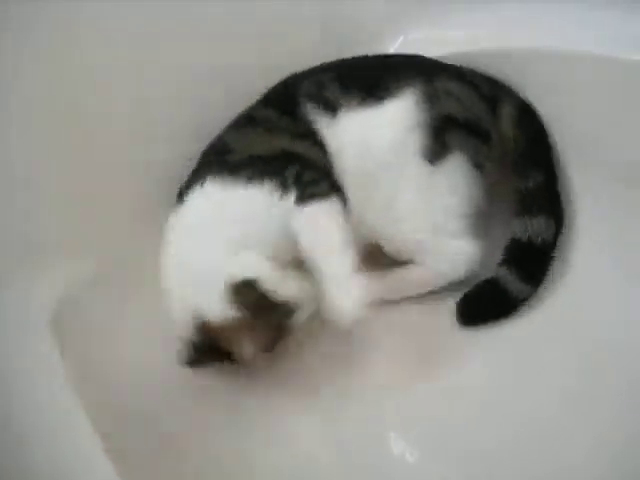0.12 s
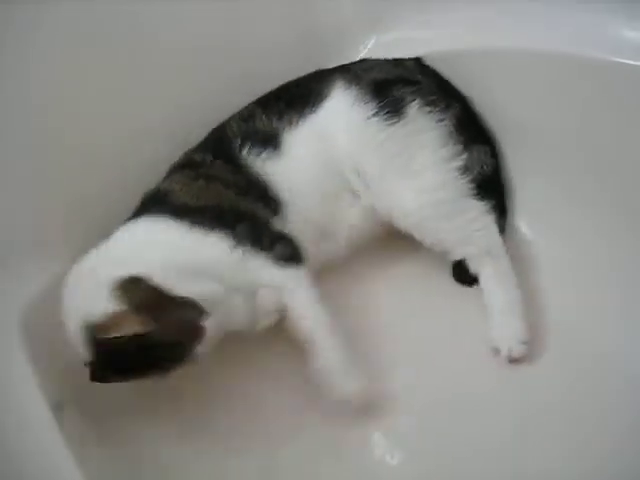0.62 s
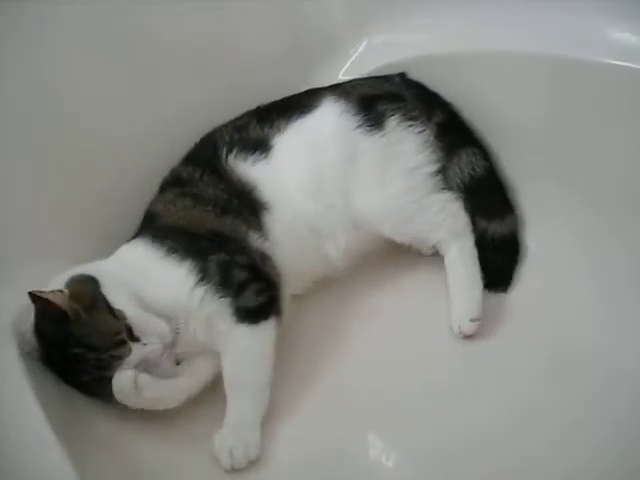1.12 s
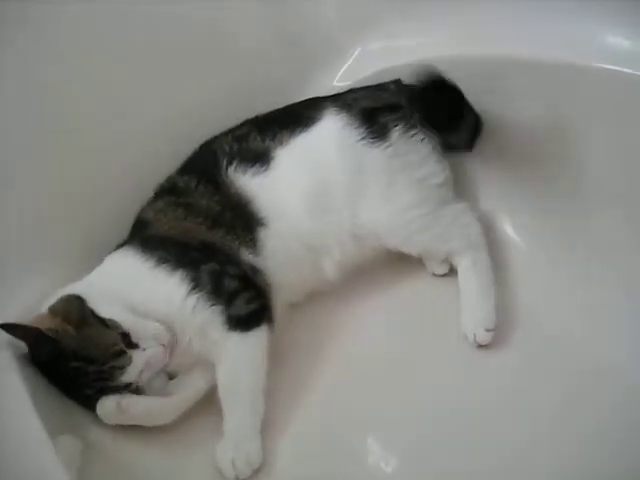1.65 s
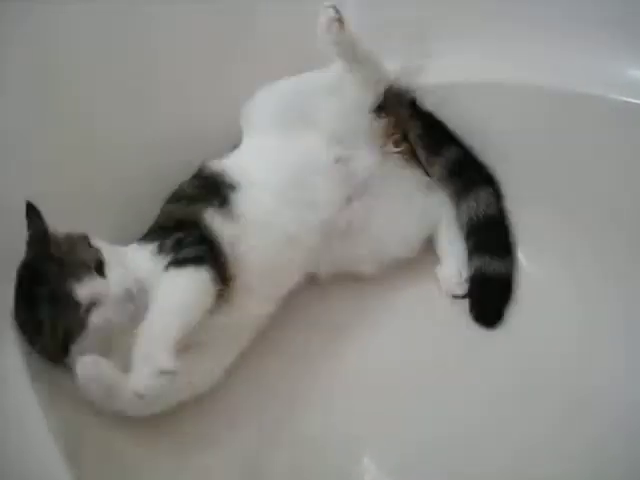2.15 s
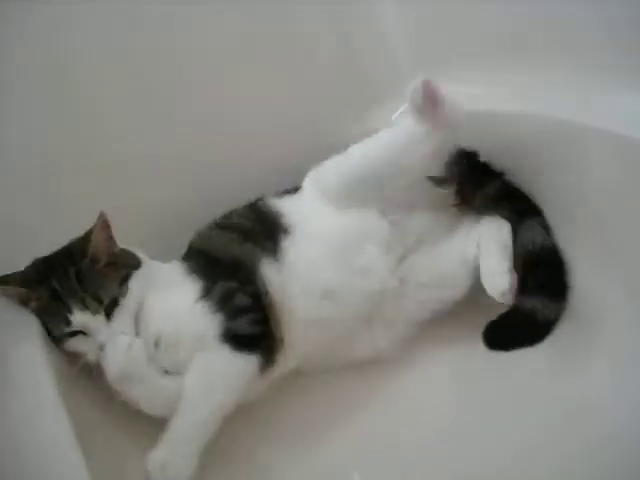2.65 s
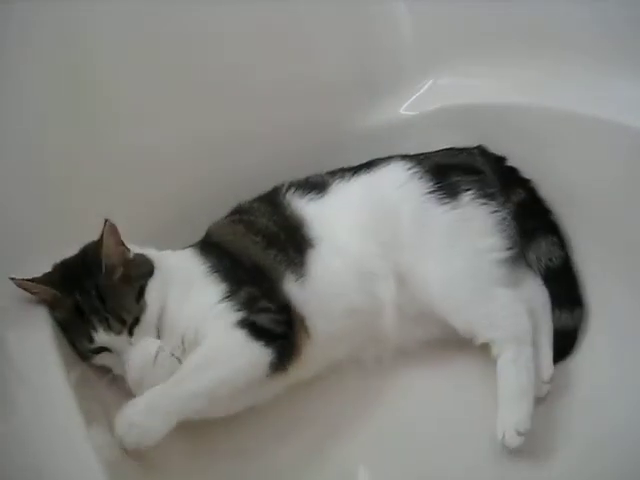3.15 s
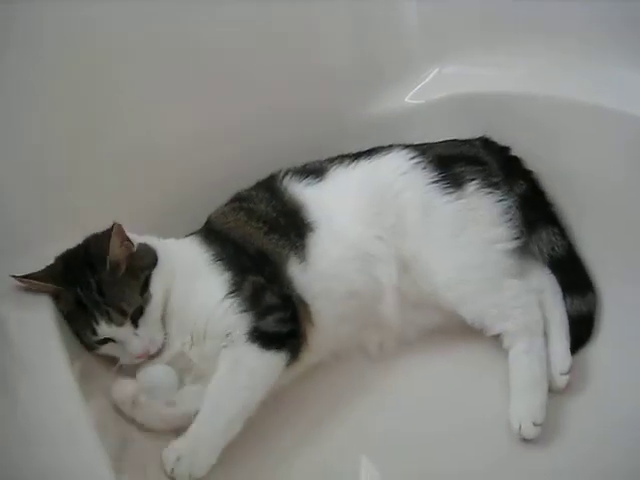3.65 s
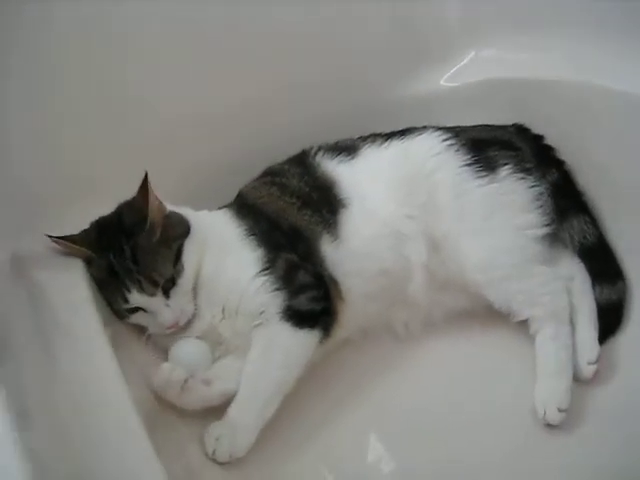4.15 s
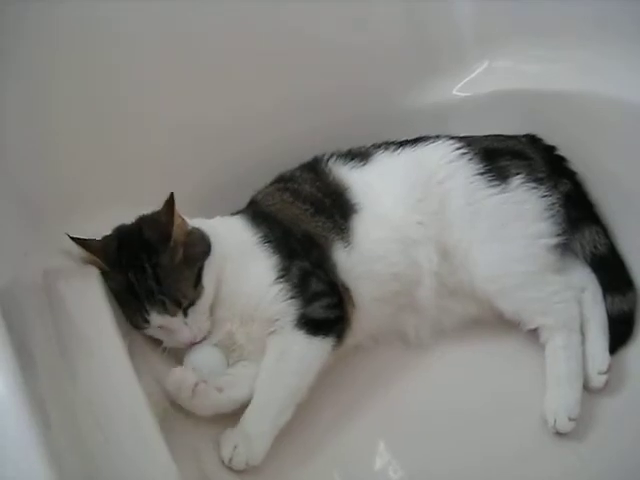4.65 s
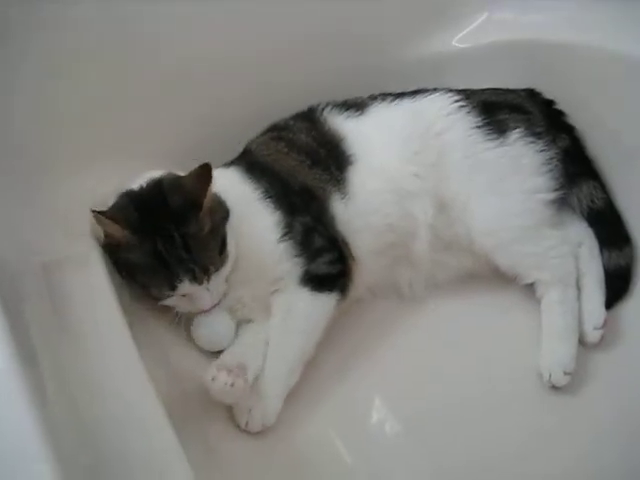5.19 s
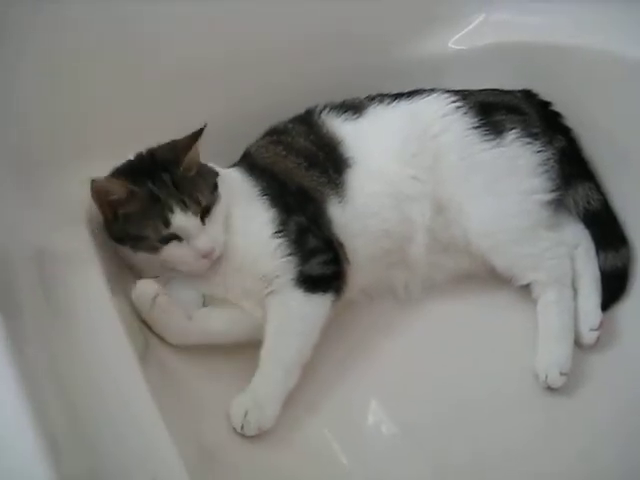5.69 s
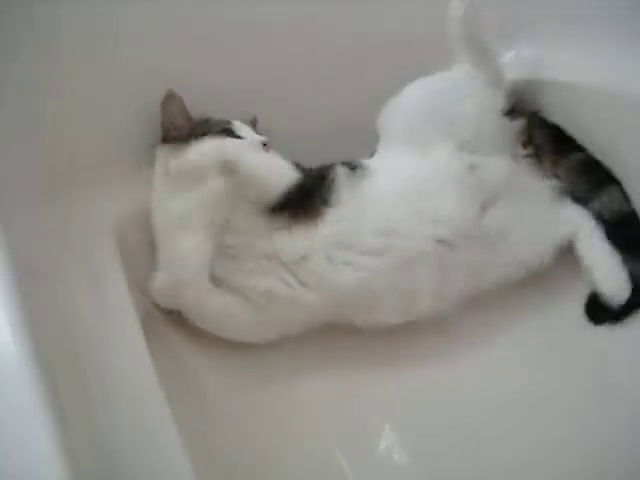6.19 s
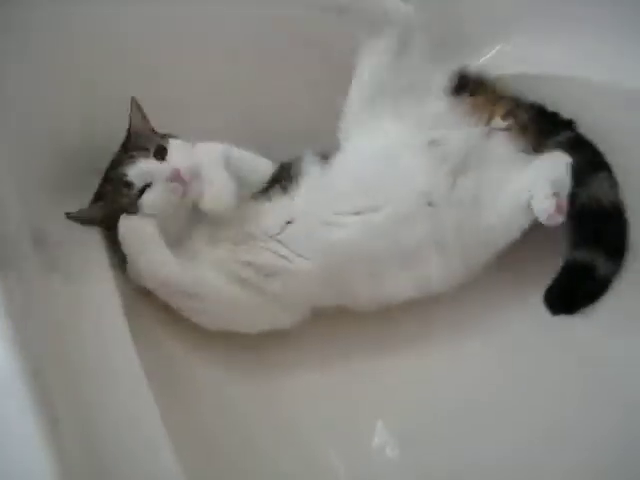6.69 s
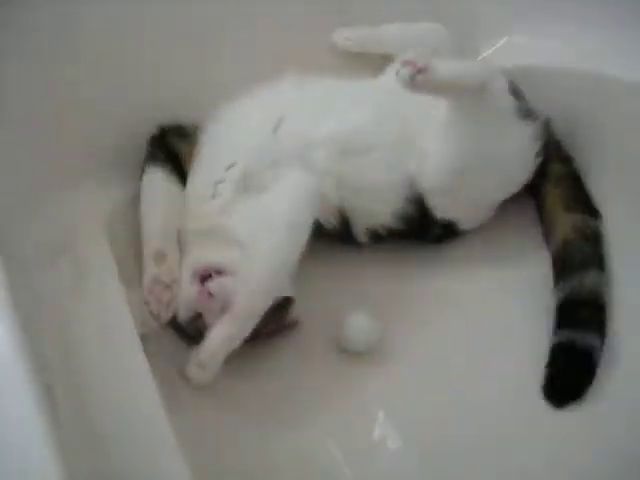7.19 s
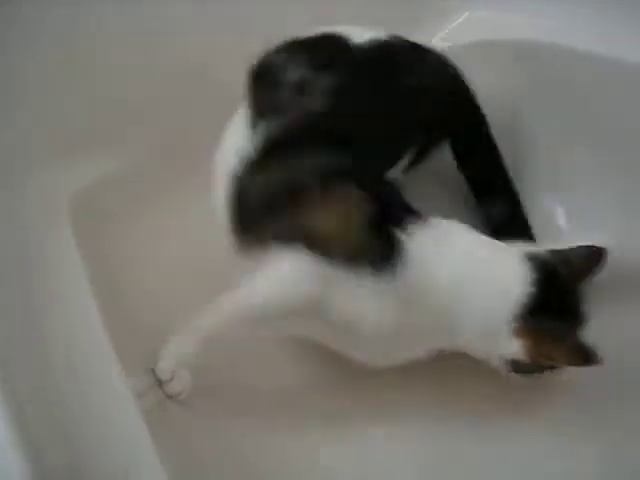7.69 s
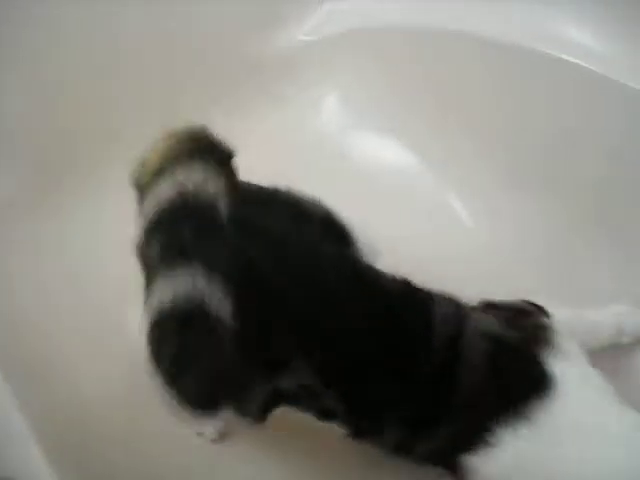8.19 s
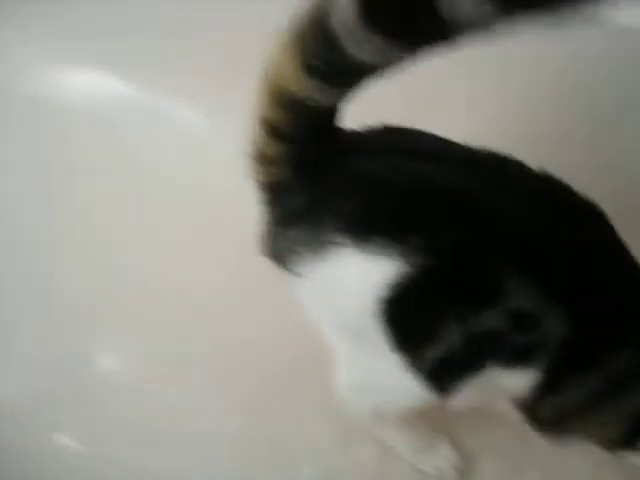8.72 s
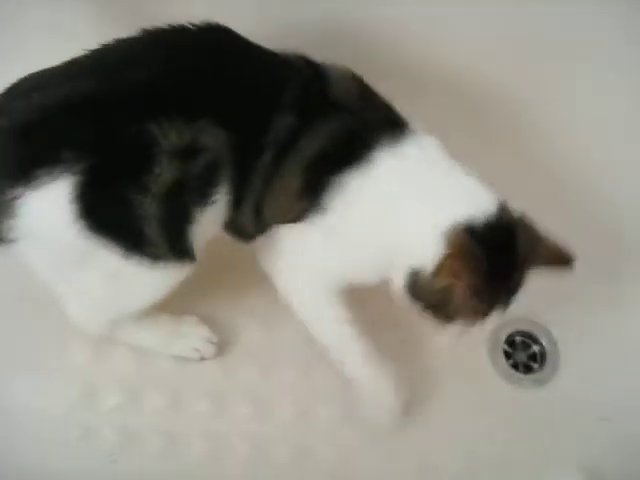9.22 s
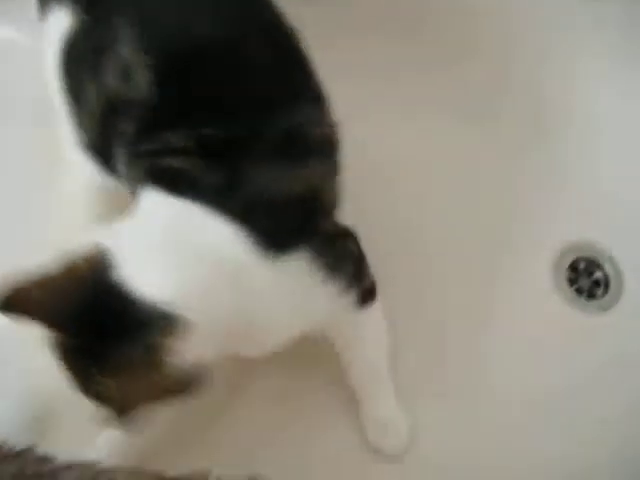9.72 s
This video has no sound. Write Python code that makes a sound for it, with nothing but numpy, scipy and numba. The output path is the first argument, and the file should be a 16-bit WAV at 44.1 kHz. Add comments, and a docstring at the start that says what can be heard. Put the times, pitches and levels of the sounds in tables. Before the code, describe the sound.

A steady soft hush of room and microphone runs throughout. Around 0.6 to 1.5 s a light hollow ball taps the bathtub, clearest at 0.74 and 0.98, with a brief fur swish near 0.7. Soft paw thuds, rubbing and dull knocks come at 2.2 to 2.4, and a hollow tap at 3.5. It is then nearly quiet, with faint fur rustle and tiny dry ticks around 5.5 to 6.7, one stronger at 6.3. At 7.0 the ball clacks sharply, with a strong swish and scrape; from 7.6 the action turns dense: bright millisecond cracks with short rattling echoes, low ringing tub thumps strongest at 7.8 and 8.15, and fur swishes. Clacks crowd 8.2 to 8.7, hollow grating rises in pitch at 8.75 to 9.0, and small bounces chatter until 9.4. Duller knocks, thuds and swishes close the last half second.

```python
"""In an empty bathtub in a tiled room, a cat plays with a light hollow ball close under a small camera.
The ball clicks and rattles: noise cracks and clumpy, dying echoes pass through the resonances of its shell.
Paws and flanks thump the tub: soft pushes make noise thuds and ring sine modes. Claws and teeth tick dryly.
Fur swishes as swelling high noise, dragging grates as rough noise in a hollow of moving pitch,
and filtered noise makes the steady hush of room and microphone."""
import sys
import numpy as np
from scipy import signal
from scipy.fft import rfft, irfft, next_fast_len
from scipy.io import wavfile
from scipy.ndimage import uniform_filter1d
from numba import njit

SR = 44100
rng = np.random.default_rng(int(sys.argv[2]) if len(sys.argv) > 2 else 0)


def pcm_store(signal):
    """Save signal as 16-bit PCM."""
    levels = np.round(np.clip(np.atleast_2d(signal), -1, 1) * 32767)
    wavfile.write(sys.argv[1], SR, levels.astype(np.int16).T)


def gain_from_decibels(decibels):
    """Convert decibel values to linear amplitude factors."""
    exponent = np.asarray(decibels, float) / 20
    return 10 ** exponent


N = 433944  # samples
CHATTER_SPREAD_DB = 4  # unevenness of the small bounces


def unit(x):
    """Scaled to rms 1."""
    return x / np.sqrt(np.mean(x ** 2))


def shaped(x, gain):
    """Filtered by a complex gain given as a function of Hz."""
    size = next_fast_len(len(x) + SR)
    hz = np.arange(size // 2 + 1) * SR / size + .01
    return irfft(rfft(x, size) * gain(hz), size)[..., :len(x)]


def resonances(x, table):
    """Steep broad resonances side by side, in alternating polarity; white noise keeps its rms."""
    def gain(hz):
        total = 0
        for k, (centre, width, db) in enumerate(table):
            off = (hz / centre - centre / hz) * centre / width
            total = total + (-1) ** k * gain_from_decibels(db) / (1 + .64j * off) ** 2
        return total / np.sqrt(np.mean(abs(total) ** 2))
    return shaped(x, gain)


def held_levels(count, hold):
    """Random levels, each held for some samples."""
    steps = np.repeat(rng.standard_normal(count // hold + 1), hold)
    return steps, hold


def walk(rate):
    """Random levels held 1 / rate s and slewed twice; spread near 1."""
    steps, hold = held_levels(N, int(SR / rate))
    return np.sqrt(2) * uniform_filter1d(uniform_filter1d(steps, hold), hold)[:N]


def add(track, s, sound):
    """Mix a sound in at a moment."""
    i = int(s * SR)
    track[i:i + len(sound)] += sound[:N - i]


def curve(table, axis):
    """One column of a table whose rows start with a time, read at every sample."""
    rows = np.array(table)
    return np.interp(np.arange(N) / SR, rows[:, 0], rows[:, axis])


@njit
def moving_band(x, hz, sharp):
    """State-variable band-pass whose centre moves every sample."""
    y, band, low = np.empty(len(x)), 0., 0.
    for i in range(len(x)):
        g = np.tan(np.pi * hz[i] / SR)
        v = (band + g * (x[i] - low)) / (1 + g * (g + 1 / sharp))
        band, low, y[i] = 2 * v - band, low + 2 * g * v, v / sharp
    return y


def pocket(x, hz, again=.38):
    """Sound bouncing in the gap beside the ball: peaks near hz and its multiples."""
    loop = np.zeros(int(SR / hz) + 1)
    loop[0], loop[-1] = 1, -again
    return signal.lfilter([1], loop, x)


def hiss():
    """Steady room hush and microphone noise, its level drifting slightly."""
    # colour of the hush: (frequency [Hz], relative density [dB per Hz])
    hush_colour = [(15, -18), (25, -2), (102, 3), (451, -1), (695, -5), (2840, -7.5), (5140, -14),
                   (6920, -14.5), (7920, -24), (8590, -24), (10100, -27.5), (16000, -17)]
    hz, db = np.transpose(hush_colour)
    noise = shaped(rng.standard_normal(N), lambda f: gain_from_decibels(np.interp(np.log(f), np.log(hz), db)))
    return gain_from_decibels(-53.5 + walk(3.32) / 2) * unit(noise)


def grit(rough_db):
    """Noise made of many uneven tiny contacts."""
    return unit(rng.standard_normal(N) * gain_from_decibels(rough_db * walk(250)))


def strokes(rest_db=-69, fade_share=.85):
    """Level in dB of all fur strokes together: each swells to its peak and fades a little quicker."""
    # fur strokes over the tub: (time of the peak [s], level [dB], time to swell by 20 dB [s])
    fur_strokes = [(0.15, -51.5, 0.5), (0.38, -54, 0.6), (0.69, -35, 0.08), (0.6, -46, 0.12),
                   (0.93, -52.5, 0.5), (1.63, -61, 0.6), (2.0, -54, 0.5), (2.21, -49, 0.3),
                   (2.33, -50, 0.2), (2.6, -58, 1.2), (4.28, -60, 0.4), (4.85, -62.5, 0.6),
                   (5.33, -56, 0.5), (5.49, -47, 0.18), (6.0, -58, 0.4), (6.15, -48, 0.16),
                   (6.33, -52, 0.1), (6.51, -52, 0.25), (6.66, -53, 0.3), (6.96, -50, 0.3),
                   (7.13, -34, 0.13), (7.32, -44, 0.4), (7.45, -44, 0.1), (7.77, -46.5, 0.4),
                   (8.1, -36.5, 0.15), (8.36, -40, 0.2), (8.42, -34.5, 0.07), (8.53, -42, 0.15),
                   (8.71, -36, 0.14), (9.11, -56.5, 0.15), (9.43, -39.5, 0.06), (9.7, -35.5, 0.08),
                   (9.83, -43.5, 0.12)]
    t, power = np.arange(N) / SR, gain_from_decibels(2 * rest_db)
    for s, db, swell_s in fur_strokes:
        away = np.maximum(s - t, (t - s) / fade_share)
        power = power + gain_from_decibels(2 * (db - 20 * away / swell_s))
    return 10 * np.log10(power)


def sliding(rolling, rough_db=2.4, knock_db=22, sharp=2.2):
    """Fur hisses high; the rolling ball and dragged paws grate in a hollow whose pitch moves with them."""
    # colour of the fur: (centre [Hz], width [Hz], relative level [dB])
    fur_colour = [(2780, 2400, 0), (6300, 1500, -11.5), (8240, 2400, -9), (10280, 2800, -1.5),
                  (13350, 2800, -2)]
    # ball and paws dragging: (time [s], level [dB], pitch of the hollow between ball and wall [Hz])
    drag_path = [(0.0, -58, 1024), (2.0, -65, 830), (2.3, -52, 810), (2.74, -69, 780), (6.05, -63, 600),
                 (6.23, -50, 580), (6.42, -60, 570), (6.65, -49, 560), (6.85, -58, 700), (6.98, -43, 1000),
                 (7.12, -38, 950), (7.29, -42, 640), (7.45, -62, 620), (7.84, -43.5, 600), (8.1, -37, 740),
                 (8.23, -45, 735), (8.38, -38, 730), (8.63, -49, 720), (8.77, -33, 880),
                 (8.86, -32.5, 1030), (8.96, -33, 1300), (9.03, -48, 1150), (9.15, -50, 1700),
                 (9.45, -44, 615), (9.84, -40, 680)]
    swish_level = gain_from_decibels(strokes() + rough_db / 2 * walk(39))
    swish = swish_level * resonances(grit(rough_db / 2), fur_colour)
    hz, rub = curve(drag_path, axis=2), grit(rough_db)
    # every small bounce knocks the hollow into a short ring
    for s, _, _ in rolling:
        add(rub, s, gain_from_decibels(knock_db + CHATTER_SPREAD_DB * rng.standard_normal(1)))
    hollow = moving_band(moving_band(rub, hz, sharp), hz, 1.)
    overtone = moving_band(moving_band(rub, 2.6 * hz, 1.), 2 * hz, 1.)
    drag_level = gain_from_decibels(curve(drag_path, axis=1) + rough_db / 2 * walk(25))
    return swish + drag_level * unit(hollow + gain_from_decibels(-15) * overtone)


def ball(click_s=.0016, grain_db=2.5, hold=1.127, low_slower=1.067, top_faster=.88, top_echo_db=-16, spike_db=25):
    """A millisecond crack in four ranges of the shell, then a clumpy crowd of echoes that holds before it dies."""
    # ball on the wall: (time [s], relative click level [dB], relative low echo level [dB],
    # relative high echo level [dB], relative 4-7 kHz level against the high echo [dB],
    # ring of the gap [Hz], basic echo t60 [s])
    wall_taps = [(0.5593, -43, -49.5, -51, -10, 1170, 0.47), (0.7376, -26, -28, -21, -5, 2880, 0.22),
                 (0.9775, -17.5, -26, -23, -14, 1223, 0.22), (0.9971, -44, -27.5, -26, -18, 840, 0.21),
                 (1.2832, -41, -30.5, -41, -14, 1132, 0.17), (1.4586, -48, -41, -48, -12, 1130, 0.16),
                 (2.343, -60, -27, -41, -35, 520, 0.16), (2.4183, -50, -38, -31, -10, 2620, 0.2),
                 (2.4269, -46, -33, -33, -11, 1600, 0.2), (3.1978, -55, -47.5, -41, -10, 1840, 0.25),
                 (3.5232, -28.5, -25, -35, -9, 1000, 0.33), (3.563, -34.5, -33, -41, -6, 1404, 0.12),
                 (5.124, -70, -55, -55, -18, 1500, 0.03), (7.007, -31, -23, -16, -20, 2300, 0.3),
                 (7.0872, -15.5, -27.5, -24, -3, 2070, 0.26), (7.305, -36, -35, -37, -10, 513, 0.4),
                 (7.398, -36.5, -45, -44, -10, 574, 0.14), (7.6292, -55, -33, -42, -10, 636, 0.22),
                 (7.6681, -14, -19.5, -19, -10, 1255, 0.2), (7.714, -42, -28, -29.5, -12, 800, 0.45),
                 (7.9092, -15.5, -63, -39, 1, 2380, 0.33), (7.953, -16, -23.5, -26, -10, 931, 0.35),
                 (8.0853, -26, -43, -38.5, -6, 1220, 0.75), (8.147, -21, -33, -37, -3, 598, 0.083),
                 (8.2033, -10, -56, -33, 1, 2400, 0.23), (8.2581, -12.5, -23, -25, -6, 803, 0.17),
                 (8.2982, -49, -31.5, -33, -8, 1400, 0.44), (8.3563, -43, -30.5, -31, -12, 1650, 0.18),
                 (8.3664, -13, -45, -29, -1, 1390, 0.21), (8.488, -32, -69, -38, 0, 570, 0.25),
                 (8.5807, -20.5, -43, -53, -1, 1040, 0.16), (8.6307, -12.5, -21, -19, -3, 1650, 0.13),
                 (8.6731, -20, -29.5, -24.5, -8, 1730, 0.38), (8.8106, -30, -32, -31, -8, 1037, 0.22),
                 (8.8852, -28.5, -33.5, -33, -6, 1100, 0.2), (8.9037, -32, -32.5, -33, -4, 1340, 0.25),
                 (8.9584, -29.5, -34, -37, -8, 1300, 0.19), (9.0347, -32.5, -45, -39, -14, 1170, 0.69),
                 (9.1293, -36, -40, -38, -10, 1770, 0.45), (9.213, -23, -32, -36, -6, 2800, 0.3),
                 (9.2372, -27, -31.5, -35.5, -10, 1800, 0.22), (9.2883, -28.5, -34.5, -38, -10, 1290, 0.35),
                 (9.3762, -14.5, -29, -35, -10, 668, 0.21), (9.4528, -27, -42, -52, -10, 630, 0.4),
                 (9.523, -51, -46, -55, -8, 1200, 0.2), (9.5818, -41, -39, -46, -16, 505, 0.21),
                 (9.6434, -30, -23, -41, -18, 695, 0.24), (9.689, -32, -23.5, -29, -22, 726, 0.33),
                 (9.8146, -28, -41, -50, -10, 686, 0.48)]
    # shell resonances in four ranges: (centre [Hz], width [Hz], relative level [dB])
    shell_low = [(600, 610, -3), (1100, 1300, -6.5), (1700, 650, -2)]
    shell_high = [(2450, 1050, 3.5), (3250, 1330, 0)]
    shell_bright = [(4500, 1200, 0), (6100, 1300, -8)]
    shell_top = [(9000, 570, 5.5), (10050, 1360, 6), (12400, 5400, 4.5), (14200, 1400, 3)]
    low, high, bright, top = np.zeros((4, N))
    t = np.arange(SR // 2) / SR
    crack, impulse = np.exp(-t / click_s), t == 0
    # late echoes have lost their treble, so the ring sinks
    sinking = .54 + .47 * np.exp(-(t / .11) ** 2)
    # the contact itself is one short push
    blow = np.sin(np.pi * np.minimum(t / .00041, 1))
    for s, click_db, low_db, high_db, bright_db, ring_hz, t60 in wall_taps:
        noise = rng.standard_normal((3, len(t)))
        # echoes arrive in clumps a few ms apart
        steps, held = held_levels(len(t), 64)
        clumps = gain_from_decibels(grain_db * uniform_filter1d(steps, held)[:len(t)])

        def echoes(t60_s):
            return clumps * gain_from_decibels(-60 * (t / t60_s) ** hold)

        body = pocket(1.3 * blow + .56 * noise[0] * echoes(t60 * low_slower), ring_hz)
        # a small gap radiates little far under its ring
        body = signal.lfilter(*signal.butter(2, ring_hz * .3, "high", fs=SR), body)
        sinking_ring = moving_band(body, ring_hz * sinking, 1.2)
        add(low, s, gain_from_decibels(low_db) * (1.55 * body + 1.4 * sinking_ring))
        snap = gain_from_decibels(spike_db) * impulse + noise[1] * (2.4 * crack + .48 * echoes(t60))
        snap = pocket(snap, ring_hz)
        add(high, s, gain_from_decibels(high_db) * snap)
        # the bright range dies sooner
        add(bright, s, gain_from_decibels(high_db + bright_db + 1.5 - 12 * t / t60) * snap)
        click = 5.5 * impulse + noise[2] * (crack + gain_from_decibels(top_echo_db) * echoes(t60 * top_faster))
        add(top, s, gain_from_decibels(click_db) * pocket(click, ring_hz))
    lower = resonances(low, shell_low) + resonances(high, shell_high)
    return lower + resonances(bright, shell_bright) + resonances(top, shell_top)


def thumps(split_hz=190, ring_db=-5, thud_db=11, thud_t60=.38, sag=.044):
    """A soft uneven push thuds and rings the tub; a harder contact reaches its upper modes."""
    # paws and flanks on the tub: (time [s], relative blow level [dB], boost of the upper modes by
    # hardness [dB], boost of the deepest mode [dB], push length [s])
    tub_blows = [(0.561, -41, 5, -3, 0.01), (0.743, -31, -34, 0, 0.021), (0.991, -41.5, -5, 3, 0.041),
                 (1.99, -47, -6, 6, 0.01), (2.239, -44, -33, 11, 0.011), (2.341, -40.5, 13, -2, 0.022),
                 (2.425, -29.5, -15, -4, 0.013), (3.585, -39, 2.5, 12, 0.057), (5.451, -49, 8, 0, 0.013),
                 (7.09, -42, 6, 10, 0.046), (7.285, -23.5, 0.5, -8, 0.016), (7.409, -26.5, -1.5, 0, 0.022),
                 (7.629, -27, 4, 0, 0.01), (7.721, -23, -6, 0, 0.076), (7.794, -17, -4, -3, 0.01),
                 (7.949, -28, 5, 0, 0.029), (8.156, -16.5, -1, -4, 0.01), (8.26, -36, -0.5, -2, 0.09),
                 (8.471, -23.5, -14, 0, 0.03), (8.76, -41, -12, -10, 0.09), (9.38, -48, 14.5, 0, 0.05),
                 (9.641, -33, 5, 10, 0.05), (9.735, -31, -2, 3, 0.09)]
    # modes of the tub before detuning and sag: (frequency [Hz], relative level [dB], t60 [s])
    tub_modes = [(87, -5, 0.4), (113, 2, 0.33), (158, -1, 0.22), (212.3, -3.5, 0.34), (253, 1, 0.31),
                 (287, 2, 0.22), (328, 0.5, 0.15), (423, 1, 0.28), (598, -3.5, 0.19)]
    # colour of the thud: (centre [Hz], width [Hz], relative level [dB])
    thud_colour = [(45.7, 85, -7.5), (108, 270, -2), (314, 460, -3.5)]
    ringing, thud, t = np.zeros(N), np.zeros(N), np.arange(SR // 2) / SR
    for s, blow_db, hard_db, deep_db, push_s in tub_blows:
        chance = rng.standard_normal((len(tub_modes), 3))
        rise = 1 - np.exp(-t / max(push_s / 4, .001))
        after = np.maximum(t - push_s, 0)
        thud_level = gain_from_decibels(blow_db + thud_db - 60 * after / thud_t60) * rise ** 2
        add(thud, s, thud_level * rng.standard_normal(len(t)))
        # the body keeps shifting on the wall and smears the pitch
        shifts = np.cumsum(rng.standard_normal((len(tub_modes), len(t))), axis=1)
        wobble_s = .0005 * shifts / np.sqrt(SR / 20)
        # the pressed wall is stiffer, so its pitch sags as it relaxes
        warped_t = t + sag * .038 * (1 - np.exp(-t / .022))
        for (hz, db, t60), (spot, detune, phase), late in zip(tub_modes, chance, wobble_s):
            contact_db = hard_db if hz > split_hz else deep_db if hz < split_hz / 2 else 0
            # where the blow lands decides how much each mode takes
            level = gain_from_decibels(blow_db + ring_db + db + 2 * spot + contact_db - 60 * after / t60)
            turns = hz * (1 + .021 * detune) * (warped_t + late) + phase
            add(ringing, s, level * rise * np.sin(2 * np.pi * turns))
    return ringing + gain_from_decibels(-20.5) * resonances(thud, thud_colour)


def ticks(rolling, tick_s=.00078, tail_s=.0077, tail_db=-20, spike_db=10, burst_db=-5):
    """Clicks with only a short smear: a bright edge and a brief ring of the shell."""
    # thin dry ticks of claws and teeth on the ball:
    # (time [s], relative tick level [dB], relative shell ring level [dB])
    claw_ticks = [(0.7475, -24, -16), (0.9917, -31, -37), (5.6349, -46, -23), (5.787, -44, -52),
                  (6.065, -51, -32), (6.0791, -52, -40), (6.0954, -48, -29.5), (6.1457, -45, -35),
                  (6.3057, -26, -11), (6.6763, -46, -41), (6.7424, -68, -34), (6.9987, -23, -48),
                  (7.5587, -40, -38), (7.6482, -21, -25), (7.656, -10.5, -15.5), (7.9837, -19, -32),
                  (8.5012, -23, -25), (8.511, -23, -27), (8.6228, -13, -29), (8.7107, -20, -26),
                  (8.7982, -19.5, -30), (8.924, -24, -30), (8.941, -30, -27), (9.048, -24, -31),
                  (9.1818, -33, -27.5), (9.2684, -28, -28), (9.3026, -27, -29), (9.357, -23, -52),
                  (9.393, -13, -38)]
    # colours of edge and ring: (centre [Hz], width [Hz], relative level [dB])
    edge_colour = [(8600, 900, -3), (11700, 2400, 10), (14600, 1300, -12)]
    ring_colour = [(1510, 460, 3), (2780, 260, 6.5), (4250, 1170, -4), (5600, 1300, 0)]
    edge, ring, t = np.zeros(N), np.zeros(N), np.arange(SR // 10) / SR
    smear = gain_from_decibels(burst_db) * np.exp(-t / tick_s) + gain_from_decibels(tail_db) * np.exp(-t / tail_s)
    for s, tick_db, ring_db in claw_ticks + rolling:
        click = rng.standard_normal(len(t)) * smear
        click[0] = gain_from_decibels(spike_db)
        add(edge, s, gain_from_decibels(tick_db) * click)
        add(ring, s, gain_from_decibels(ring_db) * click)
    return resonances(edge, edge_colour) + resonances(ring, ring_colour)


def chatter(gap_s=.011):
    """Tick rows at uneven gaps and strengths while the ball rolls in quick small bounces."""
    # spells of chatter: (start [s], end [s], relative tick level [dB], relative shell ring level [dB])
    spells = [(7.2, 7.3, -37, -44), (8.74, 8.88, -34, -36), (8.91, 8.99, -39, -40), (9.01, 9.1, -33, -39),
              (9.135, 9.16, -37, -33), (9.25, 9.37, -33, -36)]
    rows = []
    for start, end, tick_db, ring_db in spells:
        # gaps run from half to two and a half times gap_s
        when = start + np.cumsum(gap_s * (.5 + 2 * rng.random(100) ** 2))
        strength = CHATTER_SPREAD_DB * rng.standard_normal((100, 2))
        rows += [(s, tick_db + a, ring_db + b) for s, (a, b) in zip(when, strength) if s < end]
    return rows


def scene():
    """Hush, fur and dragging, ball, paws and ticks; one chatter drives both ticks and hollow."""
    rolling = chatter()
    return (hiss() + sliding(rolling) + ball() + thumps() + ticks(rolling))[None]


def low_pass(x):
    """Removes everything above the highest recorded frequency."""
    return signal.sosfilt(signal.butter(12, 16990, fs=SR, output="sos"), x)


def record(dry, notch_hz=7900, notch_width_hz=990, ceiling=.8, top_hz=15700):
    """The camera has a deep dip in the treble, rounds the peaks and cuts the top."""
    def dip(hz):
        off = (hz / notch_hz - notch_hz / hz) * notch_hz / notch_width_hz
        return (off - .06j) / (off - 1j)
    wet = ceiling * np.tanh(shaped(dry[0], dip) / ceiling)
    wet = signal.sosfilt(signal.ellip(8, .3, 42, top_hz, fs=SR, output="sos"), wet)
    return low_pass(wet[None])


dry = scene()
out = record(dry)
pcm_store(out)
```